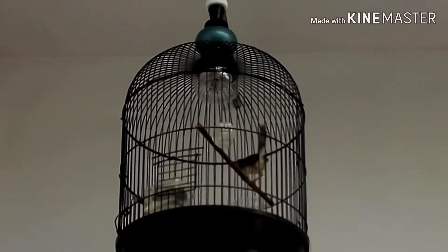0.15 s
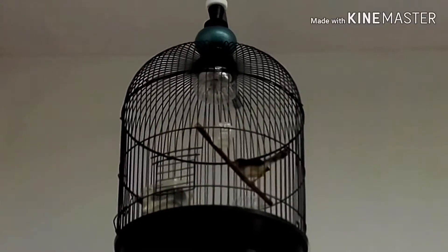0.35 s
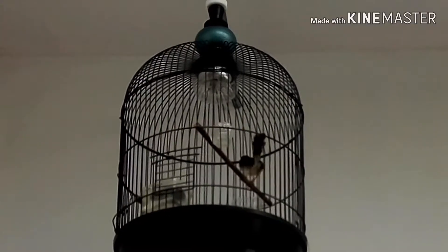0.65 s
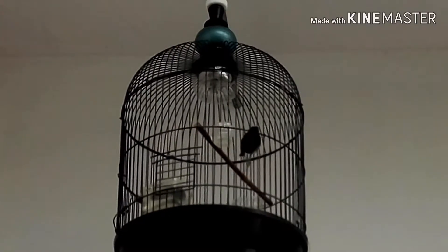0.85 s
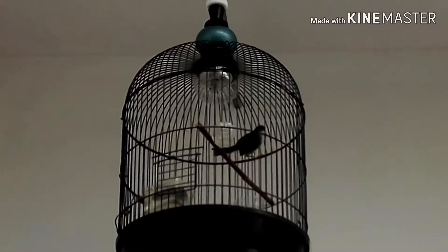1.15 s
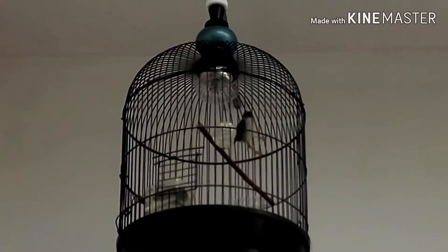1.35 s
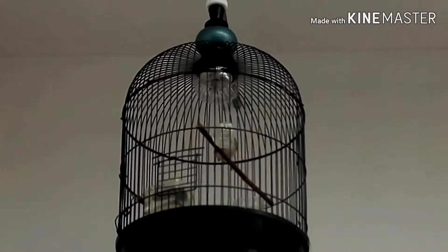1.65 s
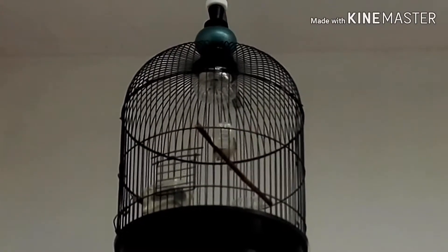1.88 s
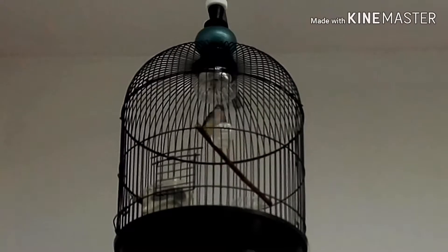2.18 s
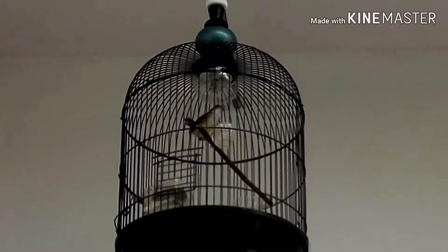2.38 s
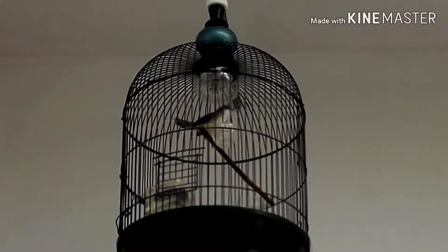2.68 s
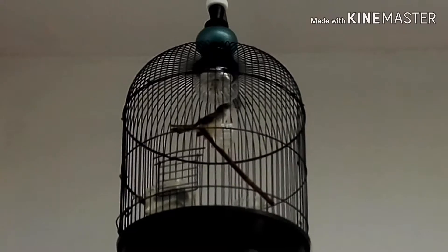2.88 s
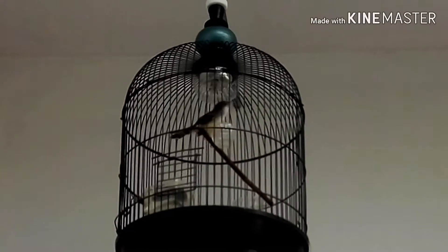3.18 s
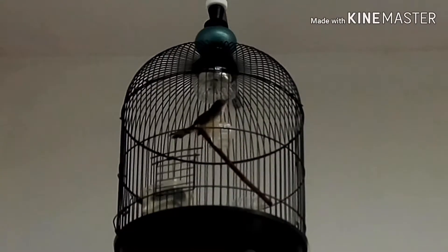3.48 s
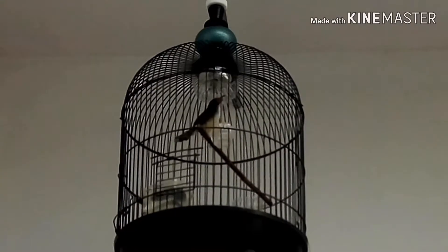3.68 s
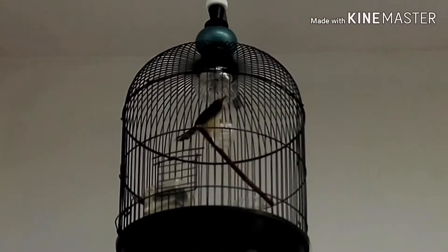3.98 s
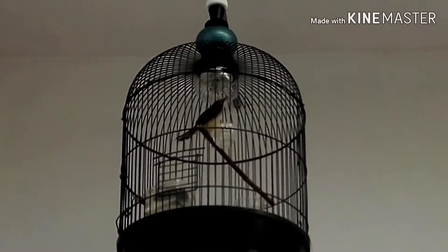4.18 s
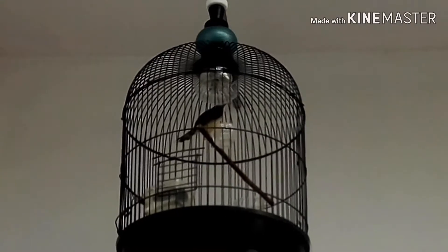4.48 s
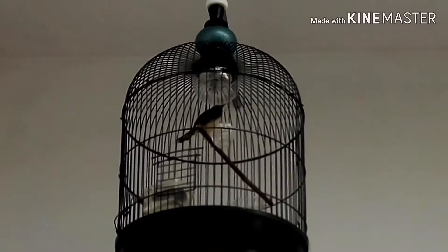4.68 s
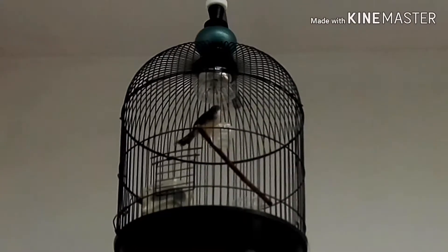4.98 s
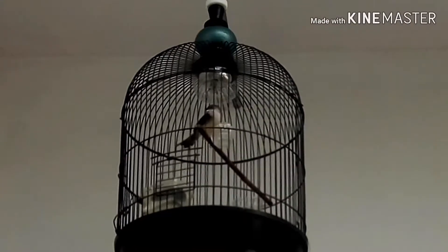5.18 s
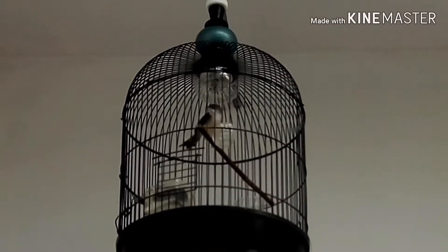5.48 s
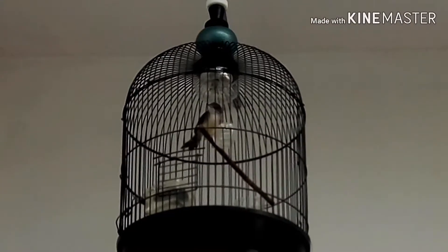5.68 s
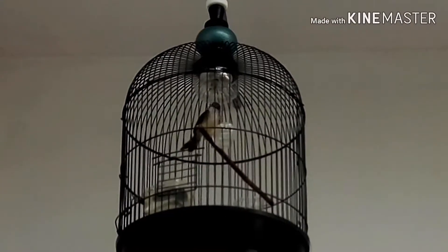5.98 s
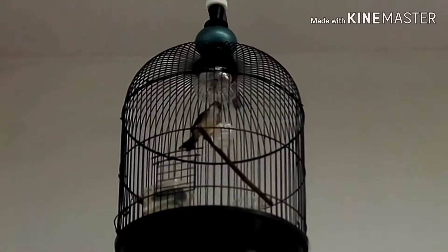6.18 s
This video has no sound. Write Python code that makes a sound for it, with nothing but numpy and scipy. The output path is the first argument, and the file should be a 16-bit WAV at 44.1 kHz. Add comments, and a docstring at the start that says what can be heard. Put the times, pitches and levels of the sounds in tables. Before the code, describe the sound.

Two birds indoors, one close and so loud it distorts the microphone, the other distant and mostly echo. Near notes sweep from high down to low and quickly back up, first as a pair, later as a steady run of six. Between them come alternating high and low falling chirps, light metallic clinks and dry cage ticks. Low room noise, barely audible hum and a fine insect trill lie beneath.

```python
"""Caged bird in a bare room

A near bird sings runs of loud V-shaped whistles (gliding sines) that overload the microphone.
A second bird farther off answers with high and low falling notes, heard mostly as reverberation.
Metal clinks (decaying modes), cage ticks (noise snaps) and faint short tones share the room.
A faint insect trill (pulsed noise) and mains hum (sines) lie with the room noise (shaped noise)."""
import sys
import numpy as np
from scipy import signal
from scipy.fft import rfft, irfft, next_fast_len
from scipy.io import wavfile
from scipy.ndimage import uniform_filter1d, map_coordinates

SR = 44100
rng = np.random.default_rng(int(sys.argv[2]) if len(sys.argv) > 2 else 0)


def unload_wav(signal):
    """Save mono or channel-first audio to the path in sys.argv[1] as 16-bit WAV at rate SR, clipped to [-1, 1]."""
    wavfile.write(
        sys.argv[1],
        SR,
        np.round(np.clip(np.atleast_2d(signal).T, -1, 1) * 32767).astype(np.int16),
    )


def gain_from_decibels(decibels):
    """Convert decibel values to linear amplitude factors."""
    exponent = np.asarray(decibels, float) / 20
    return 10 ** exponent


N = 279594
LEAD = SR // 10  # samples of stage ahead of time zero

# room noise spectrum shape: f/Hz, relative density/dB per Hz
AIR_SPECTRUM = [(12, -44), (20, -27.5), (81, -2.5), (167, -6.5), (192, -1), (299, -8.5), (325, -10),
                (1080, -16), (2290, -19), (4300, -15.5), (6000, -16), (6900, -24.5), (14100, -37),
                (15700, -39)]
# room noise rms: t/s, level/dB
AIR_LEVEL = [(0, -44.5), (.9, -50.5), (1.57, -50), (2.45, -44), (3, -49.5), (4.4, -52.5), (5.37, -49.5),
             (6.34, -43)]
# room noise left-right correlation: f/Hz, correlation
AIR_LIKENESS = [(60, 0.91), (240, 0.7), (950, 0.075), (3770, -0.34), (15000, 0.31)]
# mains hum partials: f/Hz, mean peak level/dB
HUM = [(96.9, -74.5), (199.2, -67), (296.1, -63.5)]
# insect trill rms: t/s, level/dB
TRILL_LEVEL = [(0, -61.5), (1, -65), (1.45, -69), (1.5, -58.5), (1.9, -45.5), (4.1, -55), (4.5, -57.5),
               (5.2, -59.5), (6.34, -54.5)]
# insect resonances: f/Hz, width of one of two equal stages/Hz, level/dB
WING_RESONANCES = [(4200, 470, -3.5), (4590, 60, -0.5), (6100, 250, -12.5)]
# room decay before band scatter: f/Hz, t60/s
ROOM_T60 = [(1000, 0.65), (1900, 0.31), (2300, 0.34), (2900, 0.36), (3250, 0.4), (3600, 0.31), (6000, 0.31),
            (12000, 0.18)]
# faint short tones, before the room: t/s, f/Hz, length/s, level/dB
SOFT_TONES = [(0.157, 1750, 0.045, -44), (0.175, 1110, .03, -50.5), (4.302, 1090, 0.027, -49.5),
              (4.5, 6670, .05, -42.5), (4.527, 1280, .08, -59), (4.595, 1844, 0.024, -52.5),
              (5.03, 1380, 0.067, -57), (5.987, 1061, .03, -52), (6.015, 1830, 0.063, -50.5)]
# metal modes: f/Hz, level before tilt and scatter/dB, t60/s
METAL_MODES = [(965, -19.5, 0.13), (1380, -15, 0.26), (1514, 8.5, 0.07), (1650, -11.5, 0.77),
               (2160, -18, .15), (2390, -15, 0.35), (4540, -22.5, .12), (5720, -18.5, 0.29),
               (5850, -20, 0.13), (6700, -17, .12), (7000, -3.5, 0.05), (7200, -16.5, 0.093),
               (8796, -13, 0.053), (9345, -29, 0.086)]
# metal contacts: t/s, gain on the modes/dB, hardness tilt/dB per octave
CLINKS = [(1.137, -34.5, 5.5), (1.27, -40.5, -8), (1.608, -47.5, -5), (1.702, -43.5, -5.5)]
# cage ticks: t/s, noise level before band-pass/dB, left-right direct level/dB
TICKS = [(1.492, -44.5, 1.5), (1.5977, -23.5, 18), (5.6061, -25.5, 28)]
# far bird, high notes, before the room: t/s, start, middle, end level/dB, held f/Hz
HIGH_NOTES = [(-.04, -8, -23, -20, 3200), (1.870, -6, -18, -33.5, 3200), (2.198, -19.5, -26, -20.5, 3320),
              (5.347, -38, -37, -39, 3254), (5.671, -31, -37, -28, 3300), (5.972, -34, -36, -28, 3220)]
# far bird, low notes: same columns
LOW_NOTES = [(1.735, -42, -53, -63, 2910), (2.066, -25.5, -38.5, -35, 2947), (2.365, -39, -36, -36, 2725),
             (5.211, -47, -42, -50, 2900), (5.541, -41, -42, -50, 2860), (5.828, -47, -40, -50, 2454),
             (6.125, -43, -48, -55, 2600)]
# course of a high note: stay on top/s, settling/s, time of middle level/s, of end level/s,
# droop start/s (here past the end), droop share/per s, length/s
HIGH_COURSE = (.003, .017, .014, .038, 0.063, .3, 0.062)
# course of a low note: same columns
LOW_COURSE = (0, .009, .022, .048, .036, 17, .058)
# far bird stroke edges: attack/s, release/s
FAR_EDGES_S = (0.0027, .01)
# near bird notes: t/s, level before throat and room/dB, start f/Hz,
# rise delay/s (the climb starts RISE_EARLY_S sooner), top f/Hz
NEAR_NOTES = [(0.3405, 4.5, 5150, 0.076, 5992), (0.6315, 4, 5485, 0.085, 5928),
              (2.431, 4, 5250, 0.082, 6103), (2.6913, 5, 5743, 0.085, 6008), (2.953, 4, 5630, 0.081, 5858),
              (3.2198, 4.5, 5738, 0.086, 5820), (3.4899, 3.5, 6044, 0.083, 6034),
              (3.7586, 3.5, 5874, 0.089, 6043), (6.1697, 3, 4940, 0.083, 5477)]
# near bird loudness by pitch: f/Hz, level/dB
THROAT = [(1600, -25), (2200, -21), (2700, -17.5), (3200, -6), (4000, -1.5), (4700, -1), (5500, -5.5),
          (6100, -10)]

EDGE_DB = 29.5  # depth from which a stroke swells and to which it dies
HIGH_LEAP, LOW_LEAP = .76, .42  # start above held pitch, share of it
BOTTOM_SHARE = .27  # lowest pitch over top pitch
FALL_S, FALL_BEND = .078, .63  # bend under 1: starts steep, slows
FALL_ATTACK_S, FALL_RELEASE_S = .004, .013
RISE_S, RISE_HOLD_S, RISE_DB = .05, .003, -4  # climb, stay on top, level against the fall
RISE_ATTACK_S, RISE_RELEASE_S, RISE_EARLY_S = .014, .006, .017


def unit(x):
    """Scaled to rms 1."""
    return x / np.sqrt(np.mean(x ** 2) + 1e-20)


def along(points, hz):
    """Interpolates (f/Hz, value) points on a log frequency axis."""
    f, v = np.transpose(points)
    return np.interp(np.log(hz + 1), np.log(f + 1), v)


def curve(rows):
    """One value per sample from (t/s, value) rows."""
    return np.interp(np.arange(N) / SR, *np.transpose(rows))


def wobble(rate_hz, size=N):
    """Smooth random curve, rate_hz knots a second."""
    knots = rng.standard_normal(int(size * rate_hz / SR) + 4)
    return map_coordinates(knots, [np.arange(size) * rate_hz / SR])


def filtered(x, response):
    """x through a complex response of frequency."""
    m = next_fast_len(x.shape[-1] + 8192)
    return irfft(rfft(x, m) * response(np.fft.rfftfreq(m, 1 / SR)), m)[..., :x.shape[-1]]


def resonance(f, centre_hz, width_hz):
    """Second-order band-pass response, 1 at the centre."""
    return 1j * f * width_hz / (centre_hz ** 2 - f * f + 1j * f * width_hz)


def edges(t, attack_s, release_s):
    """Level/dB of a stroke that swells at the start of t and dies at its end."""
    swell = np.clip(1 - (t - t[0]) / attack_s, 0, 1)
    die = np.clip(1 - (t[-1] - t) / release_s, 0, 1)
    return -EDGE_DB * (swell + die)


def whistle(t_s, hz, db, rough_db, second_db):
    """Unsteady sine with a weak octave, along t/s, f/Hz, level/dB points."""
    t = np.arange(t_s[0], t_s[-1], 1 / SR)
    unsteady_hz = np.interp(t, t_s, hz) * (1 + .006 * wobble(300, size=len(t)))
    phase = 2 * np.pi * np.cumsum(unsteady_hz) / SR
    tone = np.sin(phase + 2 * np.pi * rng.random()) + gain_from_decibels(second_db) * np.sin(2 * phase)
    return tone * gain_from_decibels(np.interp(t, t_s, db) + rough_db * wobble(252.6, size=len(t)))


def room():
    """Room character: a noise pattern, with strength and decay uneven from band to band."""
    hz, t, pattern = signal.stft(rng.standard_normal((2, SR // 2)), SR, nperseg=256)
    strength, stretch = rng.standard_normal((2, len(hz), 1))
    t60_s = along(ROOM_T60, hz)[:, None] * np.exp(.08 * stretch)
    return pattern, gain_from_decibels(3.0 * strength - 60 * t / t60_s)


def add(stage, space, s, sound, direct_db, early_db, tail_db,
        ceiling_db=-40, renewed=1, pan_db=0, lag=0):
    """Places a sound: direct path, ceiling, dense early echoes, diffuse tail with a renewed share."""
    pattern, decay = space
    fresh = signal.stft(rng.standard_normal((2, SR // 2)), nperseg=256)[2]
    renewed = np.clip(renewed, 0, 1)
    mixed = np.sqrt(1 - renewed) * pattern + np.sqrt(renewed) * fresh
    tail = signal.istft(mixed * decay, nperseg=256)[1]
    t = np.arange(tail.shape[1]) / SR
    tail *= 1 - np.exp(-t / 0.016)  # echoes take a moment to fill the room
    early = rng.standard_normal(tail.shape) * gain_from_decibels(-60 * t / .12) * (t > .0015)  # cage, near walls
    answer = gain_from_decibels(tail_db) * tail / np.linalg.norm(tail[0])
    answer += gain_from_decibels(early_db) * early / np.linalg.norm(early[0])
    path = 20 + np.array([int(lag), 0])  # samples, left and right
    answer[[0, 1], path] += gain_from_decibels(direct_db + np.array([.5, -.5]) * pan_db)
    ceiling = path + (SR * rng.uniform(.0018, .003, 2)).astype(int)
    answer[[0, 1], ceiling] += gain_from_decibels(ceiling_db)
    heard = signal.fftconvolve(sound[None], answer, axes=1)
    part = stage[:, LEAD - 20 + round(s * SR):][:, :heard.shape[1]]
    part += heard[:, :part.shape[1]]


def room_air():
    """Patchy shaped noise, its left-right correlation set by frequency."""
    z = signal.stft(rng.standard_normal((2, N)), nperseg=512)[2]
    patches = uniform_filter1d(rng.standard_normal(z.shape[1:]), 5, 0)
    patches = uniform_filter1d(patches, 12, 1)
    pair = signal.istft(z * gain_from_decibels(1.4 * unit(patches)), nperseg=512)[1][:, :N]

    def mid_side(hz):
        angle = np.arccos(np.clip(along(AIR_LIKENESS, hz), -1, 1)) / 2
        return gain_from_decibels(along(AIR_SPECTRUM, hz)) * [np.cos(angle), np.sin(angle)]

    mid, side = filtered(pair, mid_side)
    return gain_from_decibels(curve(AIR_LEVEL)) * unit(np.array([mid + side, mid - side]))


def mains_hum():
    """Sine partials, unsteady in level and phase."""
    t = np.arange(N) / SR
    return sum(gain_from_decibels(db + 1.8 * wobble(7.3)) * np.sin(2 * np.pi * hz * t + 0.43 * wobble(35))
               for hz, db in HUM)


def insect():
    """Wing strokes, about forty a second, pulse resonant noise over a steady, blurring share."""
    turns = np.cumsum(40 * (1 + .1 * wobble(4))) / SR
    strokes = (.5 + .5 * np.cos(2 * np.pi * turns)) ** 2 * gain_from_decibels(3 * wobble(20))
    blur = .7

    def wing(f):
        return sum(gain_from_decibels(db) * resonance(f, centre, width) ** 2 for centre, width, db in WING_RESONANCES)

    puffs = (blur + strokes) * rng.standard_normal((2, N))
    return gain_from_decibels(curve(TRILL_LEVEL)) * unit(filtered(puffs, wing))


def soft_tones(space):
    """Faint steady-pitch tones that swell and fade."""
    stage = np.zeros((2, N + LEAD))
    for s, hz, length_s, db in SOFT_TONES:
        t = np.array([0, .2, .8, 1]) * length_s
        tone = whistle(t, [hz] * 4, [db - 14, db, db, db - 11], rough_db=2.5, second_db=-44)
        add(stage, space, s, tone, direct_db=-8, early_db=-8, tail_db=-5)
    return stage


def metal_clinks(space):
    """Light contacts excite decaying modes; harder ones tilt toward the treble."""
    stage = np.zeros((2, N + LEAD))
    t = np.arange(SR // 2) / SR
    for s, db, hard_db in CLINKS:
        ring = np.zeros(len(t))
        for hz, level, t60_s in METAL_MODES:
            mode_db = level + hard_db * np.log2(hz / 1500) + rng.normal(0, 3)
            phase = 2 * np.pi * hz * t + .9 * wobble(70, size=len(t))
            ring += gain_from_decibels(mode_db - 60 * t / t60_s) * np.sin(phase)
        clink = gain_from_decibels(db) * ring * (1 - np.exp(-t / .004))
        add(stage, space, s, clink, direct_db=-7, early_db=-6, tail_db=3)
    return stage


def cage_ticks(space):
    """Dry snaps: band-passed noise with a 4.4 ms t60."""
    stage = np.zeros((2, N + LEAD))
    t = np.arange(400) / SR
    for s, db, pan_db in TICKS:
        snap = rng.standard_normal(400) * gain_from_decibels(db - 60 * t / 0.0044)
        snap = filtered(snap, lambda f: resonance(f, 5400, 4200) ** 4)
        add(stage, space, s - .001, snap, direct_db=-1.5, early_db=-14, tail_db=-2, pan_db=pan_db)
    return stage


def far_bird(space):
    """Notes drop onto a held pitch, mostly reverberant; low ones droop; the stress varies by note."""
    stage = np.zeros((2, N + LEAD))
    kinds = (HIGH_NOTES, HIGH_LEAP, HIGH_COURSE), (LOW_NOTES, LOW_LEAP, LOW_COURSE)
    for notes, leap, course in kinds:
        stay_s, settle_s, middle_s, end_s, droop_at_s, droop, length_s = course
        t = np.linspace(-FAR_EDGES_S[0], length_s, num=70)
        drop = leap * np.exp(-(np.maximum(t - stay_s, 0) / settle_s) ** 2)
        pitch = 1 + drop - droop * np.maximum(t - droop_at_s, 0)
        for s, *stress_db, held_hz in notes:
            db = np.interp(t, [stay_s, middle_s, end_s], stress_db) + edges(t, *FAR_EDGES_S)
            note = whistle(t, pitch * held_hz, db, rough_db=4.0, second_db=-56.5)
            add(stage, space, s + t[0], note, direct_db=-9.0, early_db=-14.0, tail_db=2.0, renewed=0.96)
    return stage


def near_bird(space):
    """Each note is a long fall, then a dip and a quicker rise; the throat favours middle pitches."""
    stage = np.zeros((2, N + LEAD))
    down = np.linspace(-FALL_ATTACK_S, FALL_S, num=80)
    up = np.linspace(0, RISE_S + RISE_HOLD_S, num=60)
    fall_db = edges(down, FALL_ATTACK_S, FALL_RELEASE_S)
    rise_db = RISE_DB + edges(up, RISE_ATTACK_S, RISE_RELEASE_S)
    for s, db, start_hz, delay_s, top_hz in NEAR_NOTES:
        bottom_hz = BOTTOM_SHARE * top_hz
        fall_hz = start_hz - (start_hz - bottom_hz) * np.clip(down / FALL_S, 0, 1) ** FALL_BEND
        rise_hz = bottom_hz + (top_hz - bottom_hz) * np.clip(up / RISE_S, 0, 1)
        rise_at_s = FALL_ATTACK_S + delay_s - RISE_EARLY_S
        note = np.zeros(SR // 5)
        for t, hz, level, at_s in (down, fall_hz, fall_db, 0), (up, rise_hz, rise_db, rise_at_s):
            stroke_db = db + level + along(THROAT, hz)
            stroke = whistle(t, hz, stroke_db, rough_db=3.0, second_db=-37.5)
            note[round(at_s * SR):][:len(stroke)] += stroke
        add(stage, space, s - FALL_ATTACK_S, note, direct_db=-7.0, early_db=-1.5, tail_db=-1.5,
            ceiling_db=-9, renewed=0.6, pan_db=3.5, lag=-2)
    return stage


def scene():
    """Birds and small sounds in one room, over the background."""
    space = room()
    background = room_air() + mains_hum() + insect()
    stage = soft_tones(space) + metal_clinks(space) + cage_ticks(space)
    stage += far_bird(space) + near_bird(space)
    return background + stage[:, LEAD:]


def low_pass(x):
    """Removes everything above the highest recorded frequency."""
    return signal.sosfilt(signal.butter(12, 15870, fs=SR, output="sos"), x)


def record(dry):
    """Microphone overload: loud notes clip almost hard near full scale."""
    top, hardness = .95, 14
    mix = dry / (1 + np.abs(dry / top) ** hardness) ** (1 / hardness)
    return low_pass(mix)


dry = scene()
out = record(dry)
unload_wav(out)
```